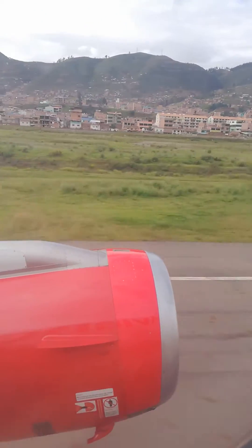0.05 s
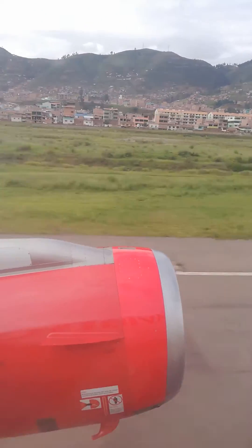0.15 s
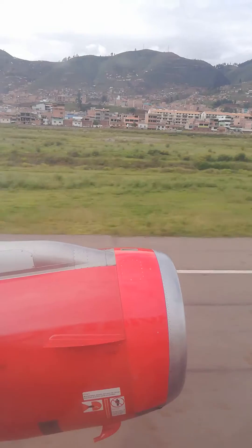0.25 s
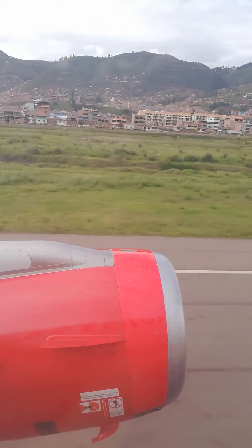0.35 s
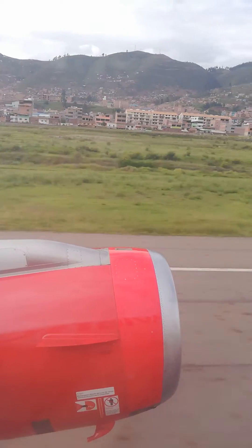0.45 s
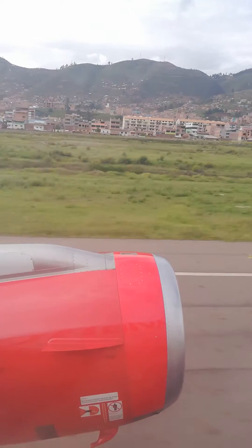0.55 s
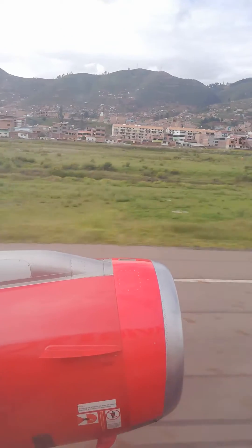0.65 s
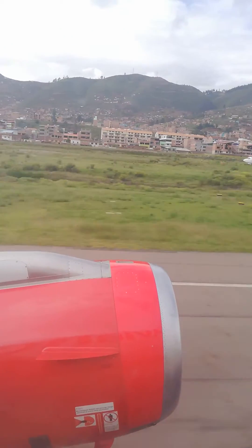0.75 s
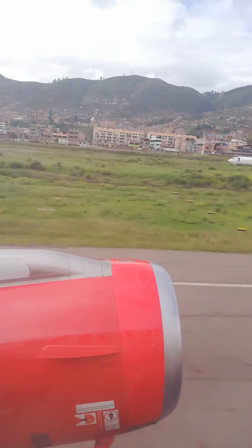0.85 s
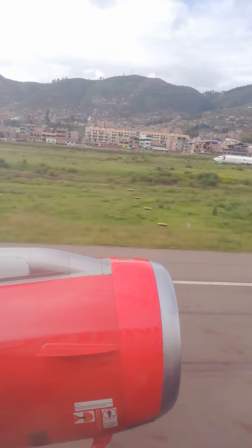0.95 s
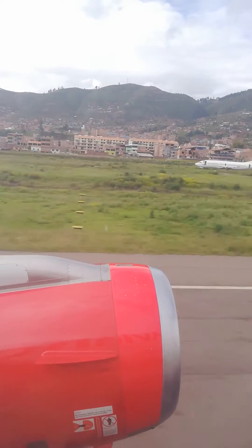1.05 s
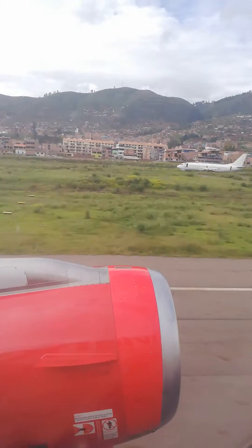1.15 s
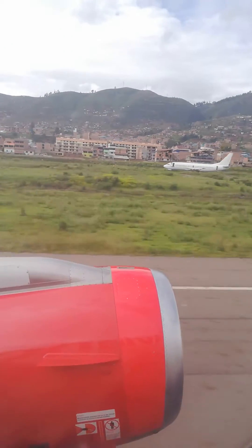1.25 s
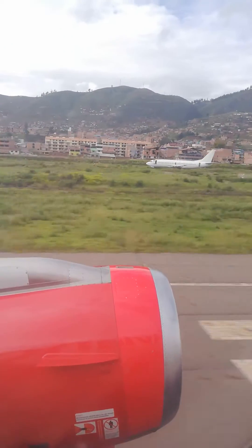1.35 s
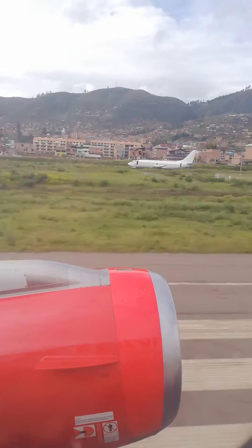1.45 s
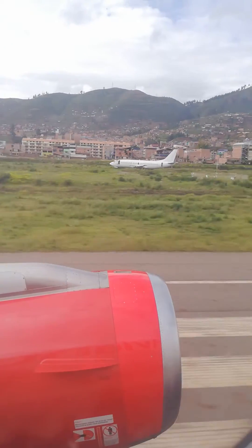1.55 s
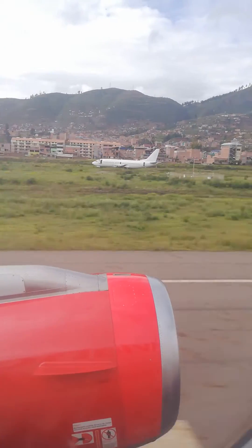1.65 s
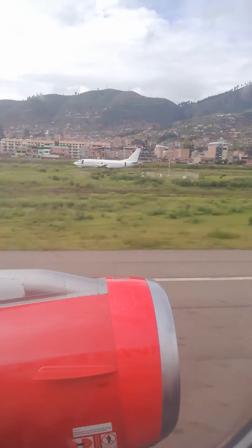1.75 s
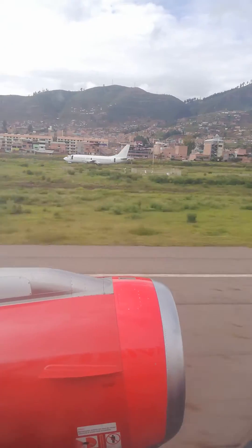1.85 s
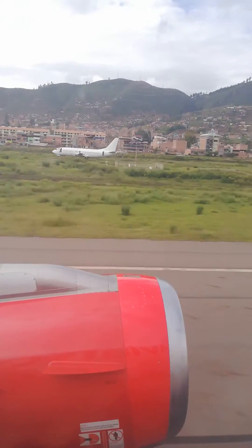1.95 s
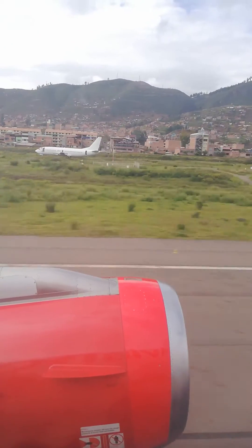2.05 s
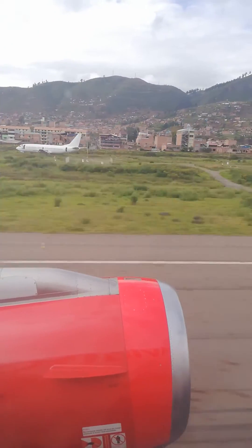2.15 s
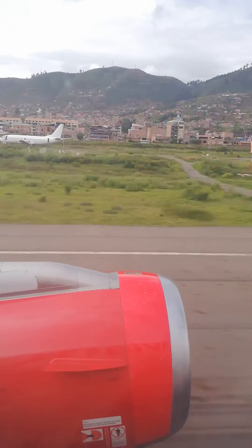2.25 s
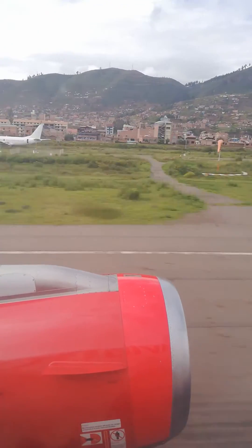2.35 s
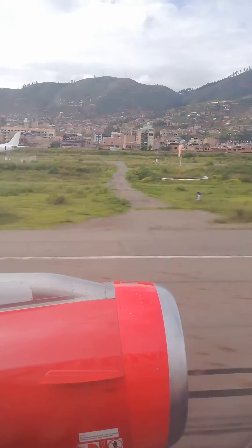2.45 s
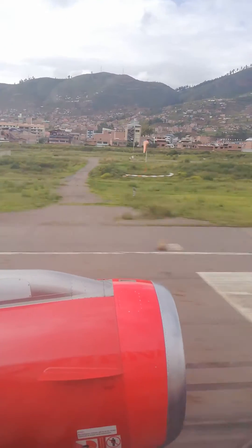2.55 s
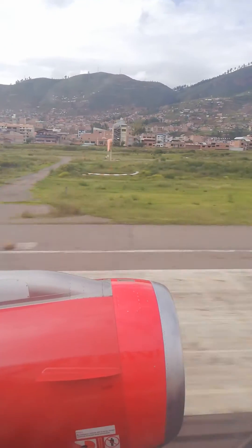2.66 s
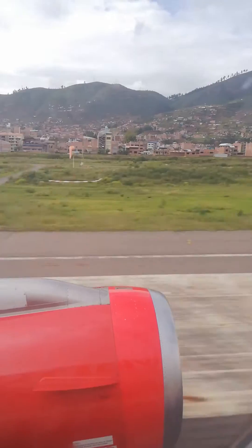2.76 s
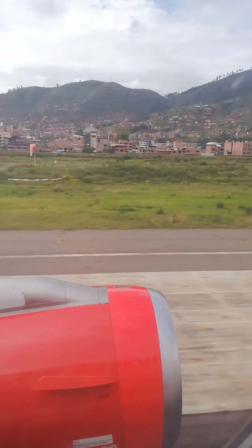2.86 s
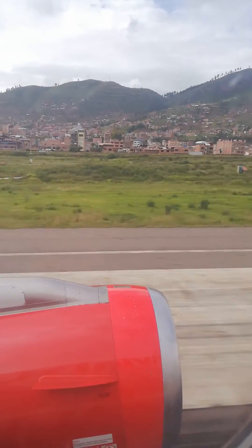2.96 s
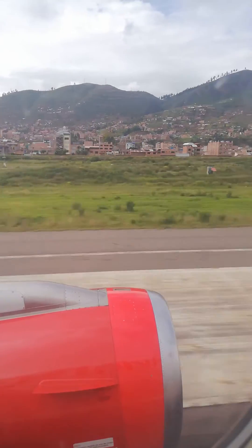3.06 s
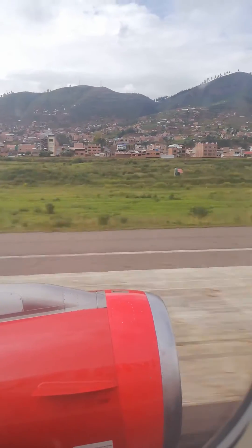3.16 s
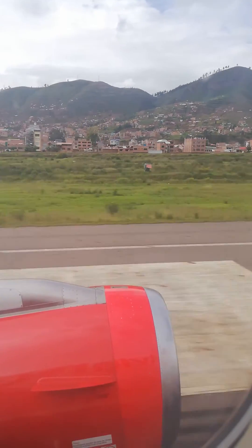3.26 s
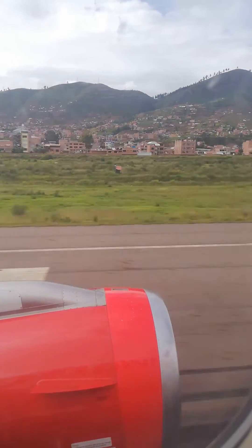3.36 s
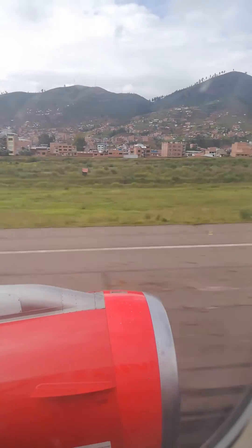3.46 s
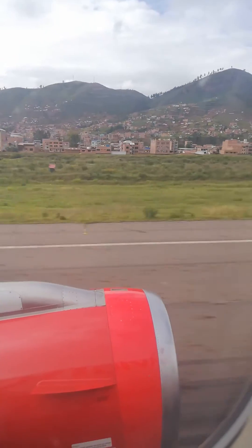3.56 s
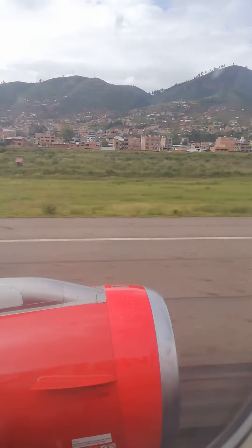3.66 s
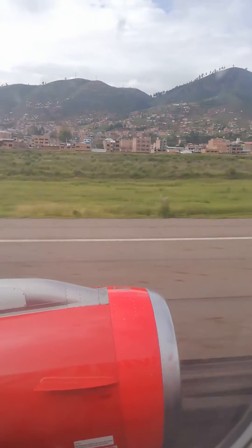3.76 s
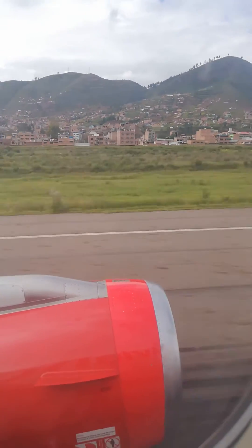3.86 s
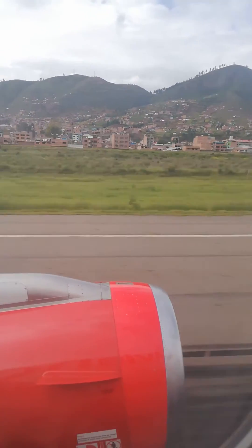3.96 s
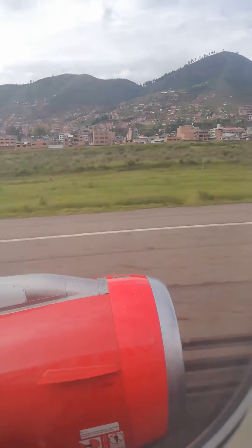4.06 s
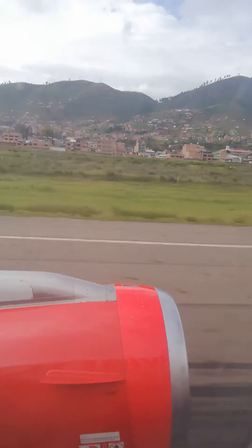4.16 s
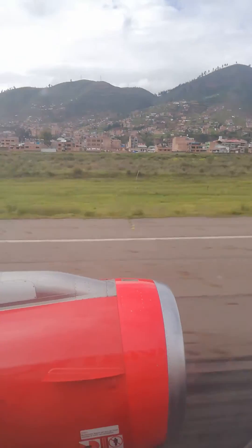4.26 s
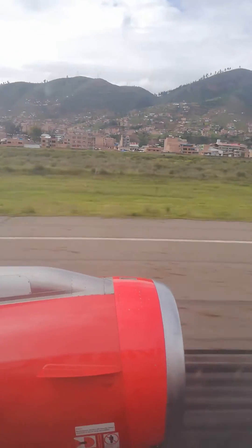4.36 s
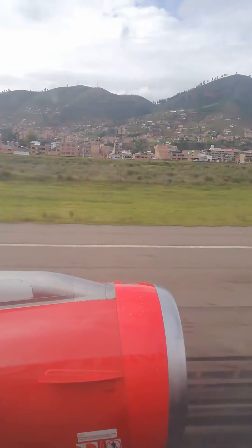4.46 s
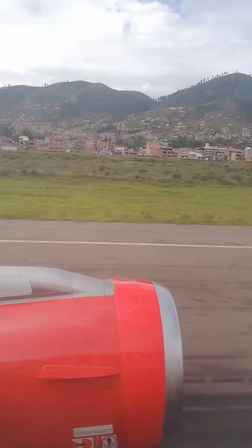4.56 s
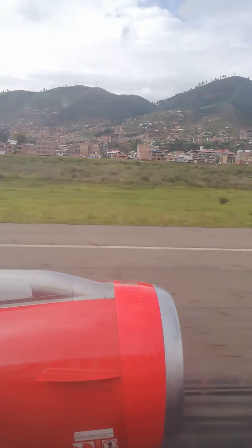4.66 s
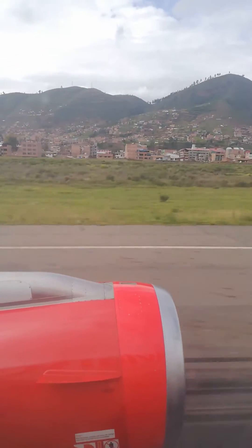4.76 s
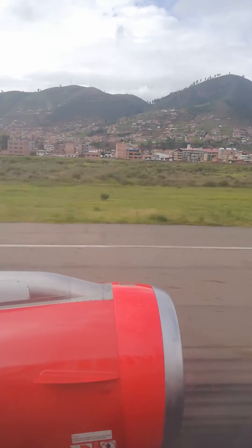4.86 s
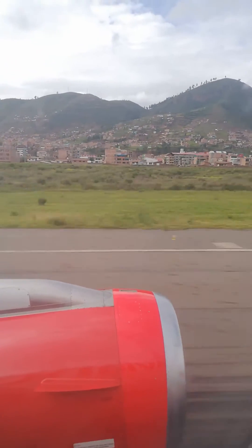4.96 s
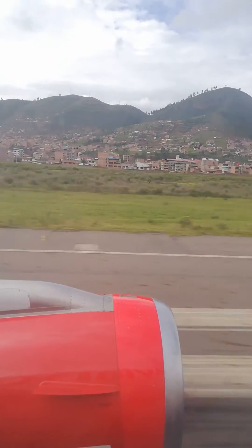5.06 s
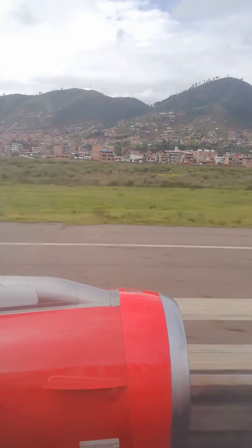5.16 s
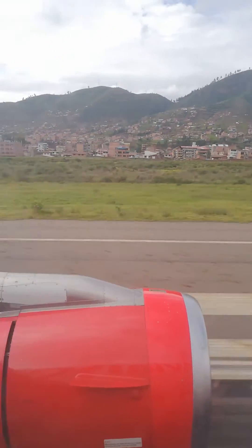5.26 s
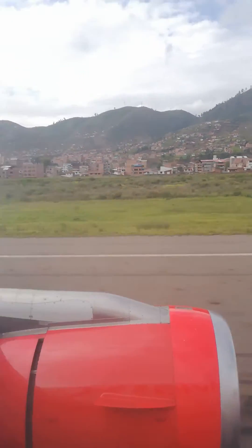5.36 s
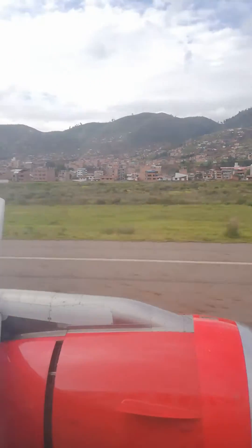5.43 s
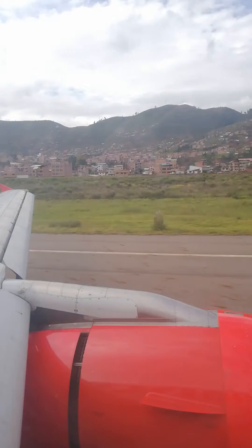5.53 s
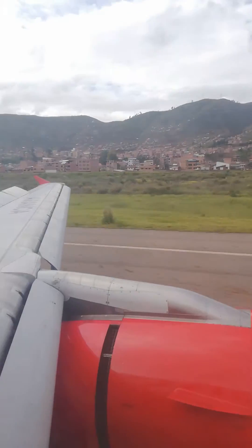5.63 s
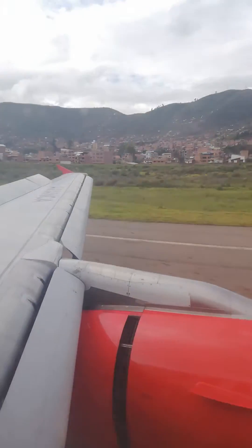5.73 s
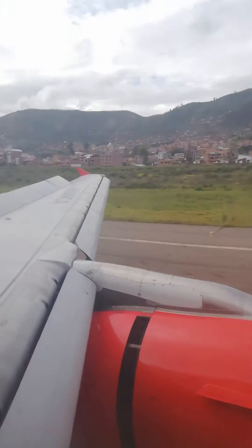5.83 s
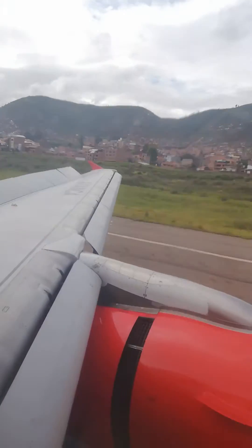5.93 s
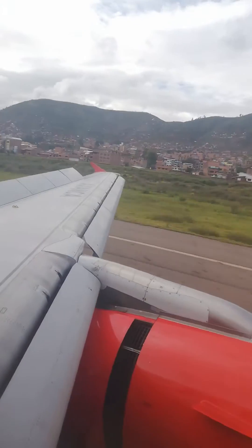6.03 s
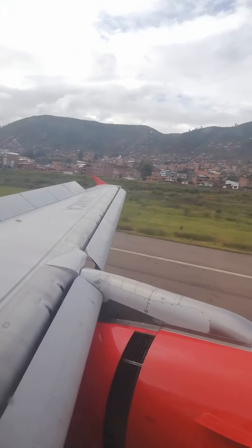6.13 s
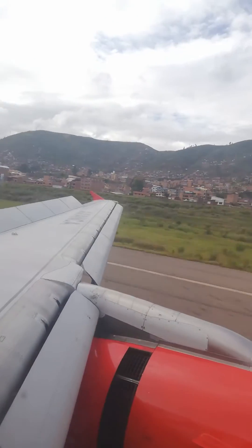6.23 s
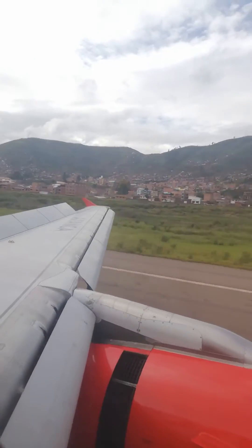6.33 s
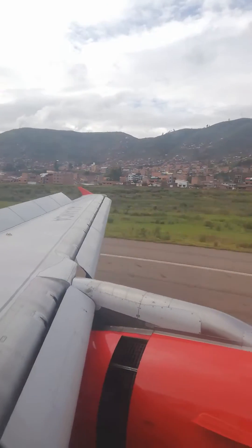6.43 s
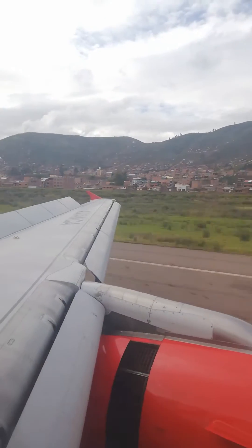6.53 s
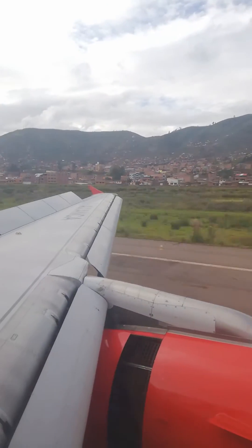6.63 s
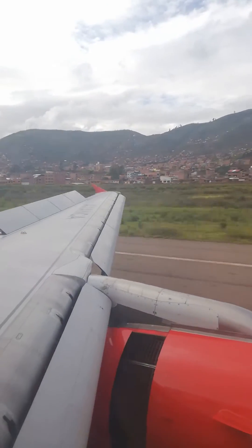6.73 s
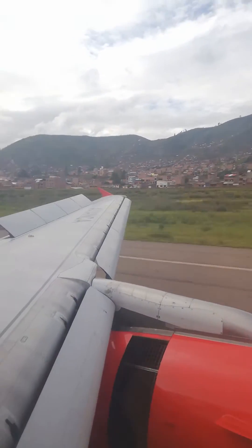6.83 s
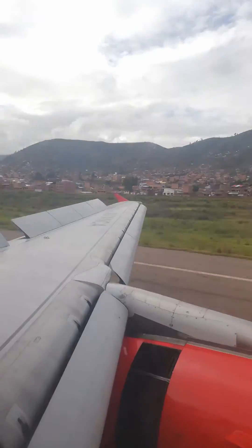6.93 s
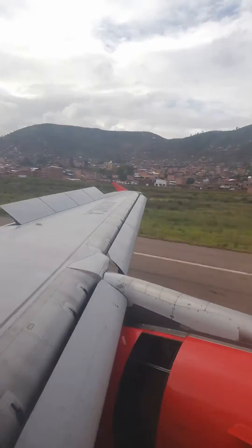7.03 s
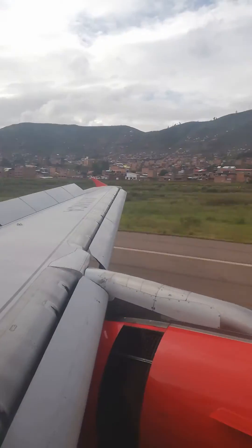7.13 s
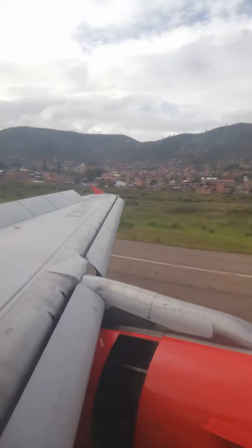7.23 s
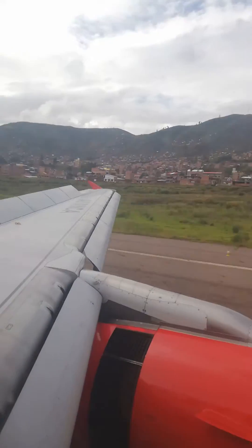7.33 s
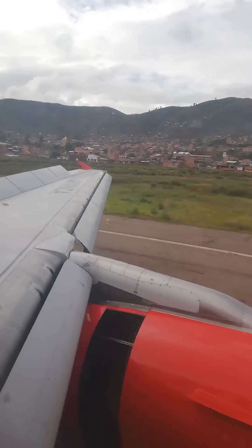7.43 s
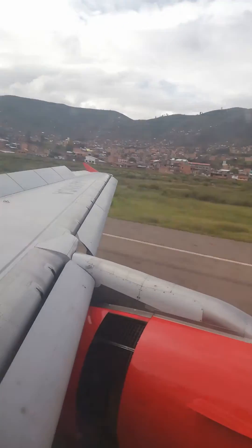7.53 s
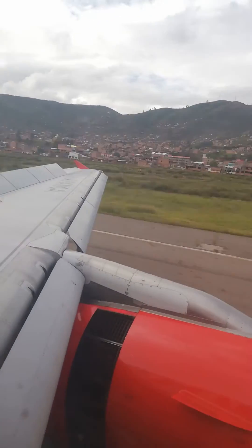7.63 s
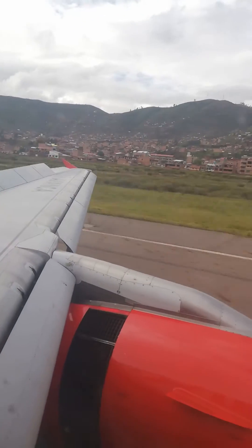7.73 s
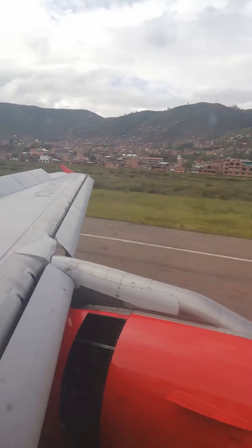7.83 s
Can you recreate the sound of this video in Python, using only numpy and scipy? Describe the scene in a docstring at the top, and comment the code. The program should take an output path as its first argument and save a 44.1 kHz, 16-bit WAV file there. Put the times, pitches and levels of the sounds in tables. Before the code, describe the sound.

Inside a landing jet's cabin, airy hiss and low engine boom, then wheels thud down, trim rattles and a reverse-thrust roar swells.

```python
"""Landing jet from a window seat

Inside the cabin, a phone held at the window: its two microphone ports hear air booming and hissing in the fuselage.
The wheels touch and pound the frame modes, then reverse thrust swells as a band of shaped noise through the wall.
Trim rattles as noise cracks with short rings and chafes in grains; close by, the phone case snaps in short blows.
The phone's gain control follows the peaks and turns everything down when the bass swells."""
import sys
import numpy as np
from scipy import signal
from scipy.fft import rfft, irfft, next_fast_len
from scipy.io import wavfile
from scipy.ndimage import uniform_filter1d

SR = 44100
rng = np.random.default_rng(int(sys.argv[2]) if len(sys.argv) > 2 else 0)


def digitize_waveform(pressure):
    """Quantize a signal to 16-bit integers and store it at the path in sys.argv[1].

    Rows of a 2-D input are taken as channels; values are limited to [-1, 1].
    """
    field = np.atleast_2d(pressure).T
    bounded = np.clip(field, -1, 1)
    quanta = np.round(bounded * 32767).astype(np.int16)
    wavfile.write(sys.argv[1], SR, quanta)


N = 347949   # samples, just under 7.9 s


def from_db(db):
    """Decibels to gain."""
    return 10 ** (np.asarray(db) / 20)


def rms_one(x):
    """Scale to unit rms."""
    return x / np.sqrt(np.mean(x ** 2) + 1e-20)


def in_time(rows):
    """Columns of a curve table, one value per sample."""
    s, *columns = np.transpose(rows)
    return [np.interp(np.arange(N) / SR, s, column) for column in columns]


def at_hz(points, hz):
    """A spectrum read on a log-frequency axis."""
    table = np.array(points)
    return np.interp(np.log(hz), np.log(table[:, 0]), table[:, 1])


def drift(rate_hz):
    """Slow random wander of spread 1: noise through two equal low-pass poles, drawn every 40 samples."""
    r = np.exp(-2 * np.pi * rate_hz * 40 / SR)
    noise = rng.standard_normal(N // 40 + 2002)
    slow = signal.lfilter([1], [1, -2 * r, r * r], noise)[2000:]   # drop the filter's settling
    return np.interp(np.arange(N) / 40, np.arange(len(slow)), rms_one(slow - slow.mean()))


# How alike the two ports hear the cabin: f/Hz, left-right likeness [-1 to 1]
PORT_LIKENESS = [(30, 0.999), (100, 0.995), (160, 0.975), (230, 0.92), (320, 0.76), (400, 0.643),
                 (480, -0.207), (560, -0.674), (660, -0.534), (800, -0.445), (950, -0.174), (1150, 0.11),
                 (1500, 0.237), (2100, -0.015), (3000, 0)]
# Which port is louder: f/Hz, left minus right level/dB
PORT_BALANCE = [(400, 0), (620, 2.2), (950, 3), (1500, 1), (2100, -3), (3300, 1), (4400, 1.5), (8100, 3),
                (12000, -.5)]
# Which port is earlier: f/Hz, lead of the right port [radians]
RIGHT_PORT_LEAD = [(60, .03), (230, .3), (400, .3), (500, .0)]


def diffuse(spectrum):
    """Noise from all around at two ports: alike in the bass, less so or opposed higher up; rms 1."""
    size = next_fast_len(N)
    hz = np.maximum(np.arange(size // 2 + 1) * SR / size, 1)
    mid, side = rfft(rng.standard_normal((2, size))) * from_db(at_hz(spectrum, hz))
    alike = np.clip(at_hz(PORT_LIKENESS, hz), -.99, .999)
    left_over_right = from_db(at_hz(PORT_BALANCE, hz)) * np.exp(-1j * at_hz(RIGHT_PORT_LEAD, hz))
    lean = left_over_right ** np.array([[.5], [-.5]])   # half to each port
    ports = lean * (np.sqrt(1 + alike) * mid + np.sqrt(1 - alike) * side * [[1], [-1]])
    return rms_one(irfft(ports, size)[:, :N])


def resonate(x, modes):
    """Parallel two-pole resonances (Hz, width Hz, dB) with alternating signs."""
    out = 0
    for k, (hz, width_hz, level_db) in enumerate(modes):
        r = np.exp(-np.pi * width_hz / SR)
        a = [1, -2 * r * np.cos(2 * np.pi * hz / SR), r * r]
        b = [(1 - r * r) / 2, 0, (r * r - 1) / 2]
        out = out + (-1) ** k * from_db(level_db) * signal.lfilter(b, a, x + 1e-18)
    return out


# Air along the cabin: t/s, hiss level/dB, vent treble level/dB
AIR_LEVELS = [(0, -36, -55), (.45, -36.5, -53), (.9, -38.5, -58), (1.4, -37.5, -54.5), (2.3, -37, -52),
              (3.5, -37.5, -53), (3.8, -39, -55), (4.5, -39, -53.5), (4.67, -38.5, -51), (4.95, -39, -54.5),
              (5.67, -37.5, -53.5), (5.92, -34.5, -49), (5.98, -35, -51.5), (6.11, -34.5, -53.5),
              (6.2, -41.5, -56.5), (6.5, -37.5, -52.5), (7.4, -37, -51), (7.7, -35, -50),
              (7.89, -39.5, -50.5)]
# Boundary layer heard through the panels: f/Hz, relative level/dB per Hz
HISS_SPECTRUM = [(250, -3), (420, -3), (500, 0), (590, -5), (1000, -8.5), (1500, -12), (1700, -15),
                 (1950, -11.5), (2120, -9), (2330, -16.5), (3300, -19), (4200, -21.5), (4550, -27),
                 (5200, -28), (6800, -53)]
# Treble of the vents: f/Hz, relative level/dB per Hz
VENT_SPECTRUM = [(2590, -23), (4400, -18), (5620, 0), (6590, 0.5), (8410, 2.5), (9060, 6), (10800, 5),
                 (13600, -7.5), (15100, -15), (15600, -27)]


def airflow():
    """Boundary-layer hiss and vent treble, as shaped noise; turbulence flutters both together."""
    hiss_db, vent_db = in_time(AIR_LEVELS)
    gust = drift(24.0)
    hiss = from_db(hiss_db + .5 * gust) * diffuse(HISS_SPECTRUM)
    vent = from_db(vent_db + 1.0 * gust + 0.55 * drift(25)) * diffuse(VENT_SPECTRUM)
    return hiss + vent


# Modes of floor and fuselage: f/Hz, width [Hz], relative level/dB under airflow, relative level/dB under the wheels
FRAME_MODES = [(28.3, 2.5, 6.5, -38), (44, 14.1, 4, 0), (61.6, 17.6, 2, -2.5), (81.7, 10.6, -2, 2),
               (90.7, 15.3, -1, -3.5), (111.9, 15.6, -8.5, -9.5)]


def frame(column, evenness):
    """Broad force shakes the frame modes; the swing is partly evened, so it holds a steadier level."""
    modes = [(row[0], row[1], row[column]) for row in FRAME_MODES]
    force = diffuse([(10, 1.0), (140, 4.0), (200, -65), (400, -80)])   # f/Hz, relative level/dB per Hz
    swing = rms_one(resonate(force, modes))
    size = np.sqrt(uniform_filter1d(swing.mean(axis=0) ** 2, size=SR // 12) + .05)
    return rms_one(swing / size ** np.clip(evenness, 0, 1))


# Airflow boom in the frame: t/s, level/dB
BOOM_LEVEL = [(0, -18), (1.2, -19.5), (2.5, -23.5), (4.5, -18), (6, -14.5), (7.89, -15.5)]


def airflow_boom():
    """Airflow shakes the frame in its low modes."""
    boom_db, = in_time(BOOM_LEVEL)
    return from_db(boom_db) * frame(column=2, evenness=0.45)


# Bouts of cloth and trim chafing: start t/s, length [s], relative level/dB,
# grain density [1/s; a third of it falls in each band at each port], centre f/Hz, spread [octaves, at least .05]
CHAFE_BOUTS = [(3.28, .15, -46, 1200, 3550, .06), (4.55, .36, -43, 300, 1600, 1.0),
               (4.84, .11, -52, 600, 8000, .8), (5.39, .1, -51, 600, 7000, .9),
               (5.93, .26, -49, 2000, 3700, .25), (5.95, .22, -42, 300, 800, .35),
               (6.325, .07, -53, 800, 5450, .05), (6.55, 1.3, -55, 250, 3200, .12),
               (6.9, .99, -58, 300, 5200, .12), (7.4, .49, -47, 300, 2750, .1),
               (7.45, .4, -49, 200, 1550, .06)]
CHAFE_FADE_S, CHAFE_DYING = 0.035, .5   # fade-in; share of a bout over which it dies away
CHAFE_RING = .04   # width of a grain's ring as a share of its pitch


def chafing():
    """Uneven grains, each ringing briefly at a pitch near the centre of its bout; bouts fade in and out."""
    out, t = np.zeros((2, N)), np.arange(N) / SR
    fades = []
    for start, length, *_ in CHAFE_BOUTS:
        fade_in = (t - start) / CHAFE_FADE_S
        fade_out = (start + length - t) / (CHAFE_DYING * length)
        fades.append(np.clip(np.minimum(fade_in, fade_out), 0, 1))
    for hz in np.geomspace(600, 12500, 50):
        draw, sizes = rng.random((2, N)), rng.standard_normal((2, N))
        grains = np.zeros((2, N))
        for fade, (s, length, level_db, per_s, centre_hz, spread) in zip(fades, CHAFE_BOUTS):
            on = slice(round(s * SR), round((s + length) * SR))
            spread = max(spread, .05)
            nearness = np.exp(-.5 * (np.log2(hz / centre_hz) / spread) ** 2)
            share = nearness / np.sqrt(per_s * spread * hz)
            struck = draw[:, on] < per_s / SR / 3
            grains[:, on] += from_db(level_db) * share * fade[on] * sizes[:, on] * struck
        out += resonate(SR * grains, [(hz, CHAFE_RING * hz, 0)])
    return out


# Loudest trim rattles: t/s, crack level/dB, ring level/dB, decay t60 [s], leading ring f/Hz
RATTLE_KNOCKS = [(.672, -44, -34, .028, 2700), (.9124, -43, -45, 0.024, 2850), (.958, -50, -58, .03, 5700),
                 (1.5704, -41, -64, 0.03, 6300), (1.664, -46, -55, .04, 3100), (3.224, -54, -48, .05, 5350),
                 (3.6677, -49, -58, 0.025, 5700), (3.7165, -46, -36.5, 0.033, 3120),
                 (3.7655, -47, -60, .02, 6300), (3.778, -40, -46, .027, 5400), (3.797, -46, -58, .02, 2630),
                 (3.8143, -56, -44, .035, 3120), (4.1785, -45, -60, .03, 5000),
                 (4.351, -33, -33, 0.022, 2630), (4.4584, -48, -58, .025, 6300),
                 (4.525, -47, -42, .06, 2950), (4.5701, -42, -46, .04, 2950),
                 (4.6006, -46, -46, 0.04, 2700), (4.6503, -43, -58, .06, 6300),
                 (4.7702, -52, -58, 0.027, 6300), (4.878, -41, -57, 0.077, 5300),
                 (4.9057, -44, -54, .051, 6300), (5.4217, -44, -55, 0.2, 6300),
                 (5.7314, -31, -46, 0.029, 5700), (5.7819, -40, -56, 0.033, 4400),
                 (5.848, -53, -44, 0.073, 4400), (5.8916, -35, -55, .025, 5300),
                 (5.909, -46, -53, 0.051, 6000), (6.3383, -42.5, -58, 0.093, 5000),
                 (6.364, -47, -54, .04, 5400), (6.4074, -48, -58, .025, 4400),
                 (6.4239, -47, -58, .03, 4400), (6.6173, -40.5, -55, 0.032, 3100),
                 (6.669, -32.5, -50, 0.025, 5300), (6.762, -36.5, -35, 0.026, 4400),
                 (6.8318, -40, -46, 0.048, 5060), (6.862, -43, -33.5, .033, 3300),
                 (6.8912, -40, -42, .025, 5000), (6.955, -43, -56, 0.044, 5000),
                 (7.014, -40.5, -52, 0.09, 2950), (7.078, -45, -50, .06, 3300),
                 (7.1086, -44, -58, .047, 5000), (7.224, -34.5, -42, 0.037, 3120),
                 (7.3209, -48, -56, .025, 4400), (7.3601, -45, -48, 0.032, 5700),
                 (7.432, -55, -45, 0.036, 2800), (7.4591, -50, -45, .03, 5400),
                 (7.486, -46, -39, .045, 3300), (7.5289, -47, -52, .025, 5100),
                 (7.5548, -41, -50, 0.031, 2630), (7.5816, -44, -48, .03, 3100),
                 (7.603, -47, -46, .03, 6300), (7.627, -50, -45, .03, 3100),
                 (7.6456, -41, -40, 0.036, 2700), (7.664, -48, -44, .03, 2700),
                 (7.6885, -47, -48, 0.033, 5300), (7.71, -42, -31, .04, 2800), (7.724, -48, -39, .03, 5200),
                 (7.7325, -43, -34, 0.052, 2800), (7.776, -47, -40, .03, 3000),
                 (7.868, -43, -55, .05, 6300)]
# Colour of the cracks: f/Hz, width [Hz], level/dB
CRACK_MODES = [(3200, 910, 10.5), (5760, 750, 2), (7050, 1300, 4), (9600, 1800, 12), (10900, 700, -1),
               (13200, 2200, -27)]
# Short rings of the trim: f/Hz, level/dB
RING_MODES = [(2630, 3), (2850, 1), (3120, 4.5), (3330, 2), (4400, 2), (5060, 5), (5350, 4), (5700, 4),
              (6300, 3)]
# left minus right; its scatter from knock to knock; scatter of crack colour
RATTLE_PAN_DB, RATTLE_PAN_SPREAD_DB, RATTLE_COLOUR_DB = 3.5, 2.2, 2.5
RING_LOSS_DB_PER_OCT, RING_DETUNE = 16, .02   # loss away from the leading ring; pitch scatter as a share
RING_DAMPING_DB_PER_S = 1000   # loose mounts damp the rings beyond the crack's own decay
RING_PORT_TURNS = .12   # how far the two ports hear a ring out of step


def rattles(shaking_db):
    """Loose trim: each knock is a crack of its own colour and a short ring; a random patter grows with the shaking."""
    envelope, rings = np.zeros((len(CRACK_MODES), 2, N + SR)), np.zeros((2, N + SR))
    t = np.arange(SR // 8) / SR
    rise = np.minimum(t / .004, 1)   # each knock swells in over a few milliseconds
    for s, crack_db, ring_db, t60, lead_hz in RATTLE_KNOCKS:
        on = slice(round(s * SR), round(s * SR) + len(t))
        *colour, pan = rng.standard_normal(len(CRACK_MODES) + 1)
        chime = rng.standard_normal((len(RING_MODES), 4))
        pan_db = (RATTLE_PAN_DB + RATTLE_PAN_SPREAD_DB * pan) * np.array([[.5], [-.5]])
        fall_db = pan_db - 60 * t / max(t60, .003)
        colour_db = RATTLE_COLOUR_DB * np.array(colour)[:, None, None]
        envelope[:, :, on] += rise * from_db(crack_db + fall_db + colour_db)
        for (hz, mode_db), (strength, detune, turn, skew) in zip(RING_MODES, chime):
            mode_db = mode_db - RING_LOSS_DB_PER_OCT * abs(np.log2(hz / lead_hz))
            mode_db = mode_db + .5 * RATTLE_COLOUR_DB * strength
            hz = hz * (1 + RING_DETUNE * detune)
            gain = from_db(fall_db - RING_DAMPING_DB_PER_S * t + ring_db + mode_db)
            turns = hz * t + turn + RING_PORT_TURNS * skew * np.array([[0], [1]])
            rings[:, on] += rise * gain * np.sin(2 * np.pi * turns)
    out = rings[:, :N]
    fade = from_db(-60 / (0.012 * SR))   # each patter tap falls 60 dB in 12 ms
    for mode, struck in zip(CRACK_MODES, envelope):
        tap_db = 0.51 * shaking_db - 45.5 + 1.3 * np.minimum(rng.exponential(1, N), 4)
        patter = (rng.random(N) < 70 / SR) * from_db(tap_db)   # about 70 taps a second in each mode
        struck = struck[:, :N] + signal.lfilter([1], [1, -fade], patter + 1e-18)
        out = out + struck * resonate(rng.standard_normal((2, N)), [mode])
    return out


# Snaps of the phone case: t/s, knock level/dB, tick level/dB, knock f/Hz, contact [s]
CASE_SNAPS = [(.2202, -12.5, -30, 720, .00032), (5.7362, -19, -45, 520, .001),
              (5.8034, -5, -6.5, 800, .00028), (5.9351, -4, -14, 740, .00032)]
# Knock of the case: f and width [both multiples of the knock pitch], level/dB
KNOCK_MODES = [(1, .53, 0), (2.5, 1.1, -18)]
# Tick of the case: f/Hz, width [Hz], level/dB per pass of two
TICK_MODES = [(7200, 3500, 0), (10800, 3500, -1), (13800, 2500, -5)]


def snaps():
    """Each snap is a short blow with the hollow knock and bright tick of the case; the far port hears it late and dull."""
    click = np.zeros(SR // 20)
    click[0], click[round(.002 * SR)] = 1, .1   # with a small bounce
    tick = resonate(resonate(click, TICK_MODES), TICK_MODES)
    tick = tick / np.abs(tick).max()
    out = np.zeros((2, N))
    ports = [(0, 0, 0, 0), (.0005, .0004, 11, 28)]   # near, far: lag s, blur s, knock loss dB, tick loss dB
    for s, knock_db, tick_db, hz, contact_s in CASE_SNAPS:
        for port, (lag_s, blur_s, knock_loss_db, tick_loss_db) in enumerate(ports):
            contact = np.hanning(round((contact_s + blur_s) * SR))
            push = np.convolve(click, contact)[:len(click)]   # the knock is a soft contact
            knock = resonate(push, [(k * hz, wide * hz, level_db) for k, wide, level_db in KNOCK_MODES])
            i = round((s + lag_s) * SR)
            out[port, i:i + len(click)] += from_db(knock_db - knock_loss_db) * knock / knock.max()
            out[port, i:i + len(click)] += from_db(tick_db - tick_loss_db) * tick
    return out


# Engine roar, idle until the reversers open: t/s, level/dB
THRUST_LEVEL = [(0, -23.5), (3.5, -24.5), (4.0, -28), (4.9, -23.5), (5.7, -20), (6.2, -13), (6.8, -13.5),
                (7.3, -11.5), (7.89, -9.5)]
# Engine through the wall: f/Hz, relative level/dB per Hz
ROAR_SPECTRUM = [(53, -50), (90, -6), (130, -4), (180, -8), (218, -6), (250, -12.5), (300, -16),
                 (345, -22.5), (400, -19.5), (432, -29), (490, -29.5), (555, -41.5), (650, -36), (840, -39),
                 (1250, -53.5), (1550, -50.5), (1850, -54), (2100, -52), (2350, -61), (3200, -59.5),
                 (3700, -76), (5000, -100)]


def engine_roar():
    """Engine noise shaped by the cabin wall, following the thrust with a slow random wander."""
    roar_db, = in_time(THRUST_LEVEL)
    return from_db(roar_db + 0.68 * drift(8.4)) * diffuse(ROAR_SPECTRUM)


# Tyres rolling from touchdown on, loaded by the brakes: t/s, level/dB
ROLLING_LEVEL = [(3.63, -80), (3.68, -10), (4.5, -26), (4.9, -26), (5.6, -10), (6.1, -19), (6.4, -10),
                 (7.0, -12.5), (7.89, -7)]
# Jolts through the landing gear, first the touchdown and its rebounds: t/s, level/dB
GEAR_JOLTS = [(3.651, -8.5), (3.80, -8.5), (3.921, -13.5), (4.03, -9.5), (4.17, -13.5), (4.259, -10.5),
              (4.40, -15.5), (4.68, -17.5), (4.93, -17.5), (5.15, -16), (5.33, -19), (5.44, -26),
              (5.56, -16), (5.86, -12.5), (6.2, -8.5), (6.74, -10), (6.84, -13.5), (7.3, -11), (7.66, -12)]
JOLT_RISE_S, JOLT_HOLD_S, JOLT_FALL_DB_PER_S = 0.0127, 0.049, 189


def wheel_force_db():
    """Force of the gear in dB: rolling plus jolts that rise, hold and die away, added as powers."""
    t = np.arange(N) / SR
    power = from_db(in_time(ROLLING_LEVEL)[0]) ** 2
    for s, level_db in GEAR_JOLTS:
        fall_db = JOLT_FALL_DB_PER_S * np.maximum(t - s - JOLT_RISE_S - JOLT_HOLD_S, 0)
        rise = np.clip((t - s) / JOLT_RISE_S, 0, 1)
        power = power + (rise * from_db(level_db - fall_db)) ** 2
    return 10 * np.log10(power)


def wheels(force_db):
    """The gear's force pounds the frame modes."""
    return from_db(force_db) * frame(column=3, evenness=0.31)


def scene():
    """All sources at the two ports, background first."""
    force_db = wheel_force_db()
    background = airflow() + airflow_boom()
    close_by = chafing() + rattles(force_db) + snaps()
    return background + close_by + engine_roar() + wheels(force_db)


def record(dry):
    """The phone: gain control follows the peaks and recovers slowly, overs are rounded, the top is cut."""
    level_db = 20 * np.log10(np.abs(dry).max(axis=0) + 1e-4)
    release_db = 30 * np.arange(N) / SR   # 30 dB per second
    held_db = np.maximum.accumulate(level_db + release_db) - release_db
    r = np.exp(-1 / (0.011 * SR))   # cut smoothed over 11 ms
    cut_db = signal.lfilter([1 - r], [1, -r], .5 * np.maximum(held_db + 8.0, 0))   # half of what passes -8 dB
    rounded = 1.053 * np.tanh(dry * from_db(-cut_db) / 0.83)
    rounded = rounded * np.minimum((N - np.arange(N)) / (.003 * SR), 1)   # stops without a click
    top_cut = signal.ellip(12, .5, 80, 15800, fs=SR, output="sos")   # low-pass at 15.8 kHz
    return signal.sosfilt(top_cut, rounded)


dry = scene()
out = record(dry)
digitize_waveform(out)
```